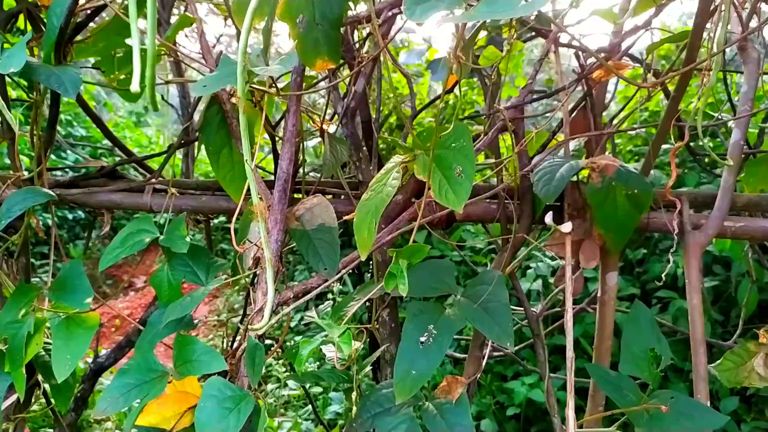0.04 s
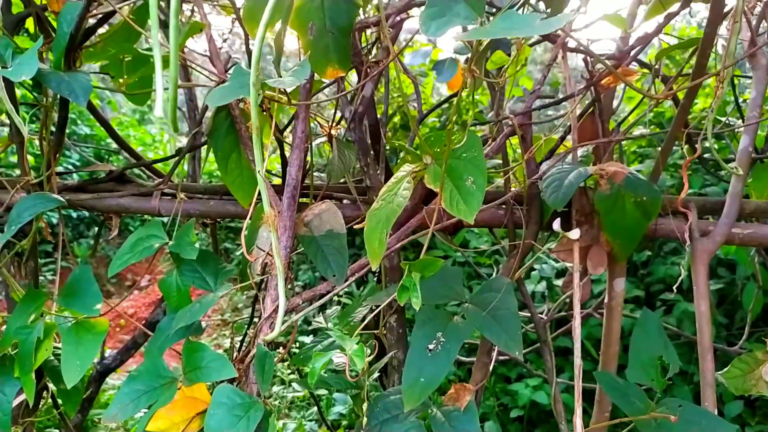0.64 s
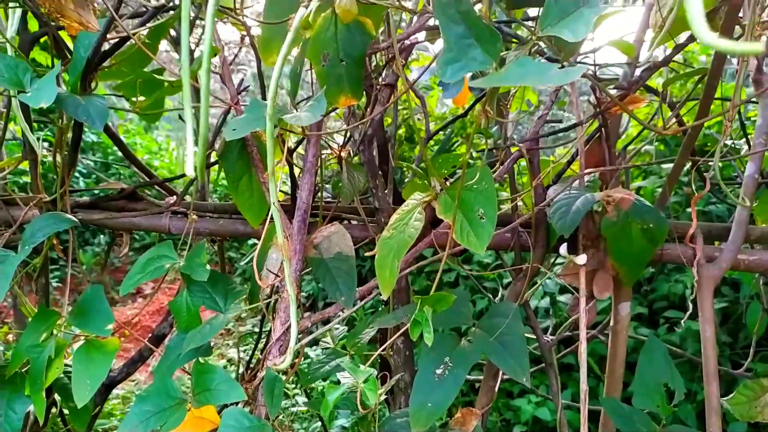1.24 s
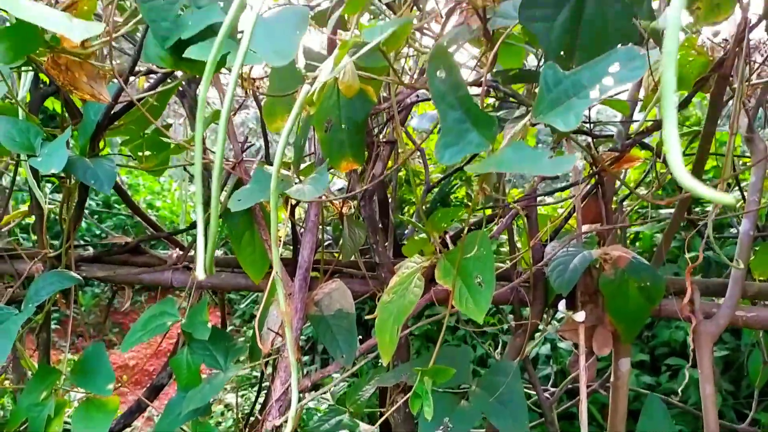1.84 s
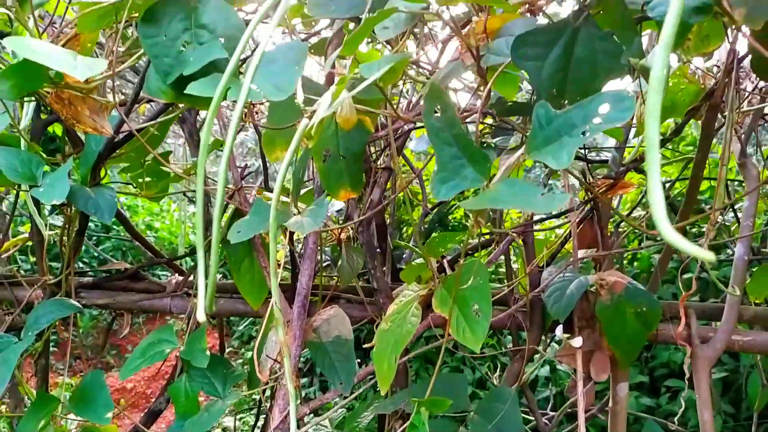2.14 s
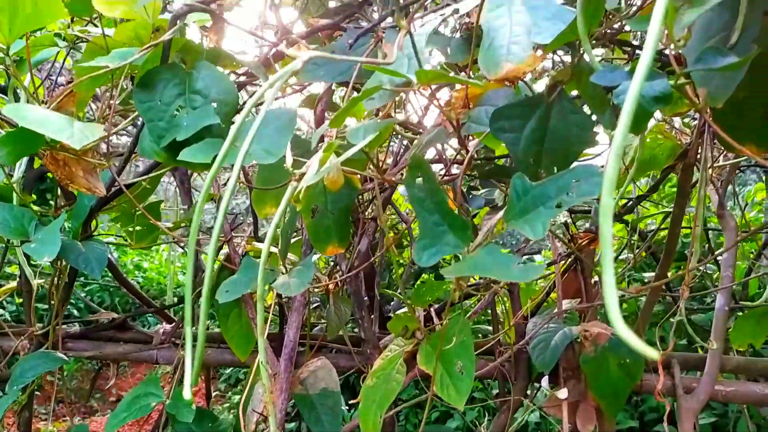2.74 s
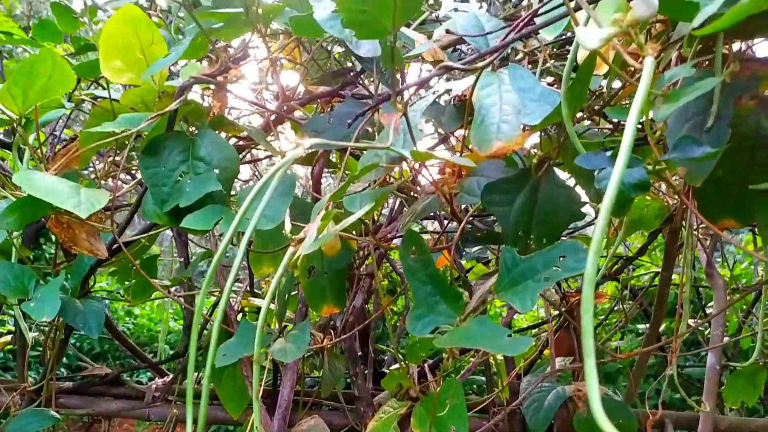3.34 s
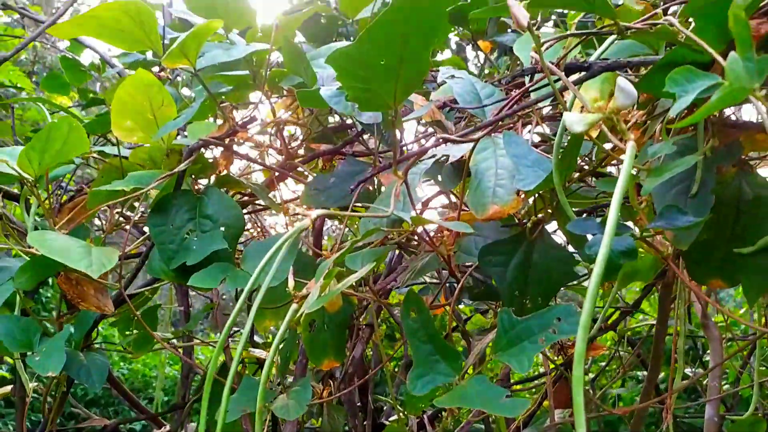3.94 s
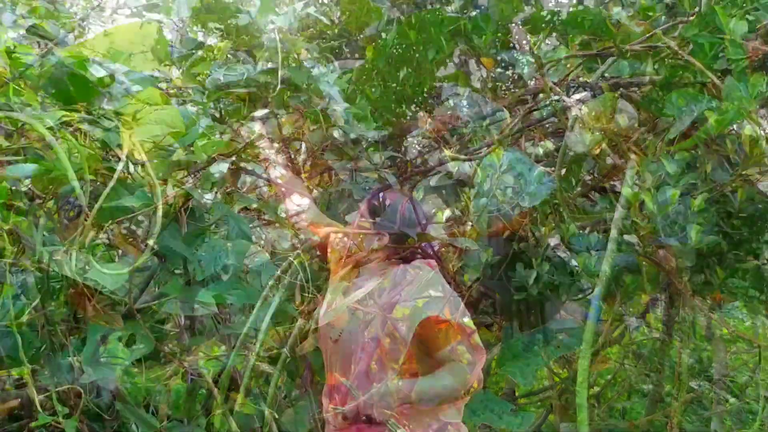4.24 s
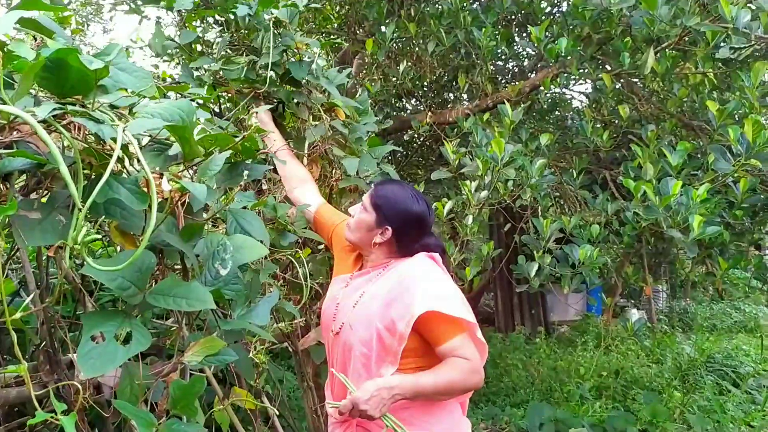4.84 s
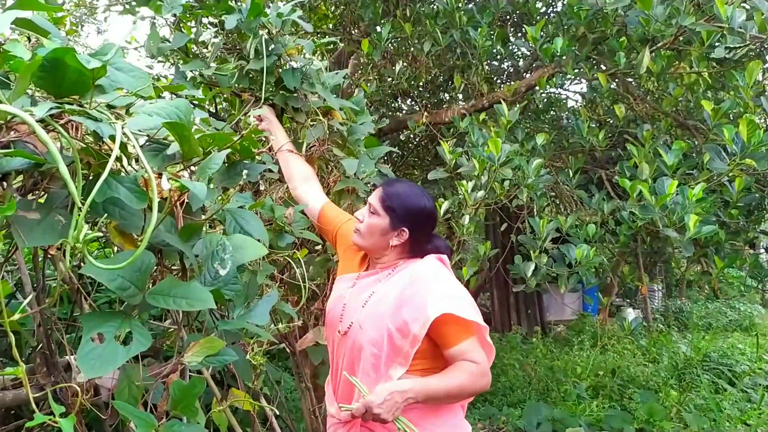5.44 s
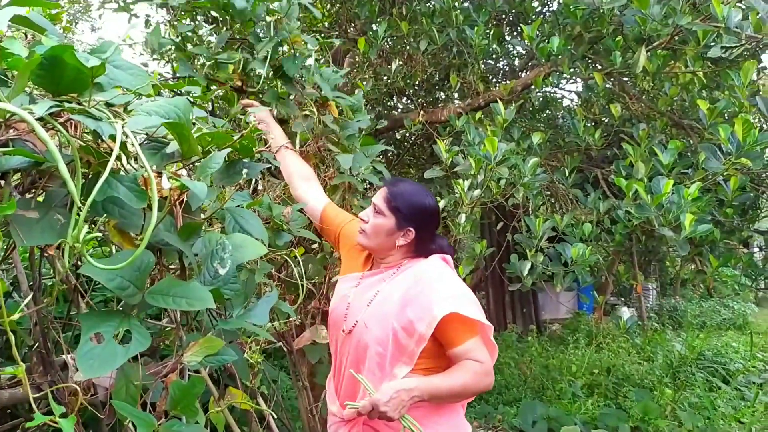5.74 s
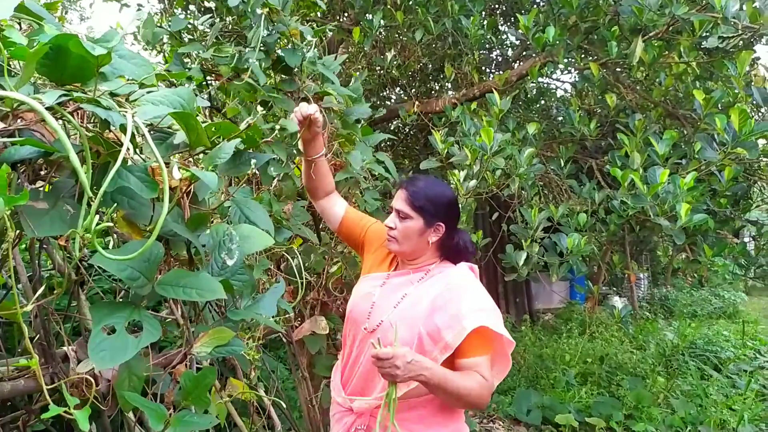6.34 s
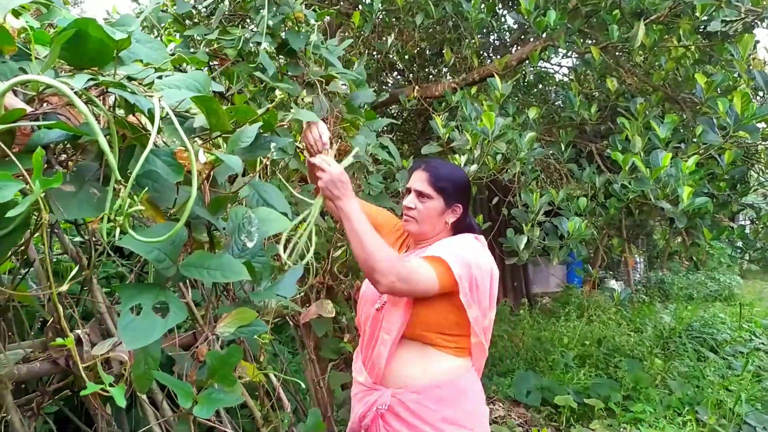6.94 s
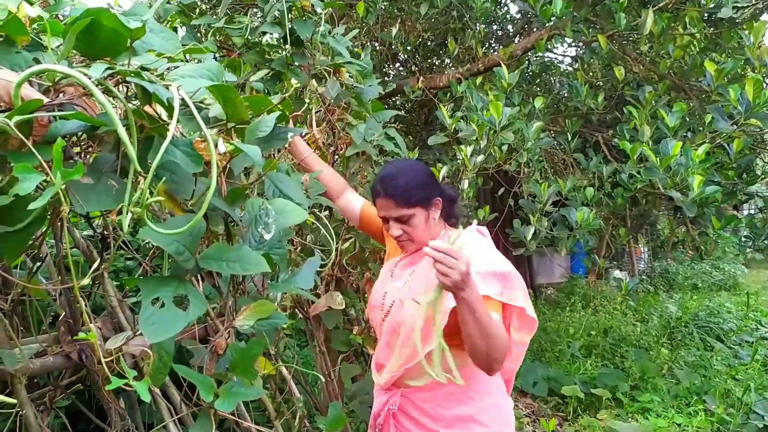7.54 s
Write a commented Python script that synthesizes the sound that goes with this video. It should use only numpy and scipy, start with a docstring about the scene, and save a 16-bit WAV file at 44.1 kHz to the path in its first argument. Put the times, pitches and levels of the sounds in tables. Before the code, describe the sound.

A faint, high insect drone with pulsing cricket trills runs throughout, over a soft outdoor rumble and thin hiss. Close by, bean pods are picked from a vine. A crisp snap comes at about 0.1 seconds, followed by small ticks and leaf rustles. The two loudest cracks land at about 1.2 and 1.4 seconds, the second with tearing fibres and a very brief high ring. The wooden trellis knocks faintly under the tugs. Lighter snaps and rustles follow around 2.3, 2.7 and 3.3 seconds. Near 4.2 seconds the background dips briefly, then returns with the insects a little louder on the left and one short rasp. A cluster of softer snaps comes from the left between 5.4 and 5.7 seconds, two small ones follow near 6.6, and a light leaf brush passes at about 7.4 seconds.

```python
"""Long bean pods snap off a garden vine, each stalk parting in a burst of tearing fibres.
The snaps scatter through the foliage, pulled leaves rustle, the wooden trellis answers each tug
and one freed pod rings. Insects drone and trill with their wings above a faint outdoor rumble and hiss.
Midway the background dips briefly and crossfades to a second outdoor spot,
with insects louder on the left."""
import sys
import numpy as np
from scipy import signal
from scipy.fft import rfft, irfft, next_fast_len
from scipy.io import wavfile

SR = 44100
rng = np.random.default_rng(int(sys.argv[2]) if len(sys.argv) > 2 else 0)


def unload_wav(signal):
    """Save mono or channel-first audio to the path in sys.argv[1] as 16-bit WAV at rate SR, clipped to [-1, 1]."""
    wavfile.write(
        sys.argv[1],
        SR,
        np.round(np.clip(np.atleast_2d(signal).T, -1, 1) * 32767).astype(np.int16),
    )


N = 334719
T = np.arange(N) / SR
CROSSFADE_S = (3.9, 4.32)   # start and end of the background crossfade between the two spots
# crisp colour of a leaf edge catching: freq_hz, level_db
LEAF_EDGE = [(300, -22), (1400, -15), (2600, 1), (4500, -13), (8000, 2.5), (12000, 2), (16000, -6)]


def from_db(db):
    """Decibels to gain."""
    return 10 ** (np.asarray(db) / 20)


def rms_one(x):
    """Scale to unit rms."""
    return x / np.sqrt(np.mean(x ** 2) + 1e-20)


def panned(pan_db):
    """Constant-power stereo gains; pan_db is left minus right."""
    return np.sqrt(2 / (1 + from_db(np.array([[-2], [2]]) * pan_db)))


def at_hz(curve, hz):
    """Read a curve on a log-frequency axis."""
    freqs, values = np.array(curve).T
    return np.interp(np.log(hz + 1), np.log(freqs), values)


def coloured(x, spectrum):
    """EQ noise to a spectrum, at unit rms."""
    size = next_fast_len(x.shape[-1])
    gain = from_db(at_hz(spectrum, np.fft.rfftfreq(size, 1 / SR)))
    return rms_one(irfft(rfft(x, size) * gain, size)[..., :x.shape[-1]])


def resonate(x, hz, width_hz):
    """Two-pole resonance applied twice for steep skirts; unity gain at the peak."""
    r = np.exp(-np.pi * width_hz / SR)
    zeros = np.array([1, 0, -1]) * (1 - r * r) / 2
    poles = [1, -2 * r * np.cos(2 * np.pi * hz / SR), r * r]
    return signal.sosfilt([np.r_[zeros, poles]] * 2, x + 1e-18)


def noise_band(hz, width_hz, shape=(2, N)):
    """Noise through one resonance, at unit rms; stereo by default."""
    return rms_one(resonate(rng.standard_normal(shape), hz, width_hz))


def drift(rate_hz):
    """Random wander at unit rms."""
    return rms_one(np.interp(T * rate_hz, np.arange(4096), rng.standard_normal(4096)))


def swell(centre_s, level_db, half_s):
    """Bell-shaped rise and fall around one moment."""
    return from_db(level_db) * np.exp(-.5 * np.minimum(((T - centre_s) / half_s) ** 2, 100))


def gate(start_s, end_s, fade_s):
    """Held envelope with a linear fade at each end."""
    return np.clip(np.minimum(T - start_s, end_s - T) / fade_s, 0, 1)


def throb(pulse_hz, drift_hz, unsteady=.12):
    """Sine tremolo at an uneven pace."""
    pace_hz = pulse_hz * (1 + unsteady * drift(drift_hz))
    return np.sin(2 * np.pi * np.cumsum(pace_hz) / SR)


def ticks(per_s, size_db, tick_s=0.00096):
    """Random stereo ticks of uneven size, each a tiny dying burst."""
    sizes = from_db(size_db * np.minimum(rng.exponential(1, (2, N)), 4))
    hits = sizes * (rng.random((2, N)) < per_s / SR)
    power = signal.lfilter([1], [1, -np.exp(-1 / (tick_s * SR))], hits ** 2 + 1e-18)
    return np.sqrt(power) * rng.standard_normal((2, N))


def bed_fader(first_db, second_db, dip_db):
    """Background gain: fades in, holds one level for each spot and dips briefly at the crossfade."""
    opening_db = np.interp(T, [0, 0.15], [-6.5, 0])
    lull_db = dip_db * swell(4.22, 0, half_s=0.31)
    return from_db(opening_db + lull_db + np.interp(T, CROSSFADE_S, [first_db, second_db]))


def rumble(level_db=-56.5, surge_db=1.38):
    """Far rumble reaches both ears alike in the bass; each spot gives it its own colour."""
    # colour at the first and second spot: freq_hz, level_db
    first_eq = [(25, -19), (40, -17), (52, 1.5), (62, -1), (73, 2.5), (92, -5), (140, -10.5), (250, -14.5),
                (450, -15.5), (630, -19.5), (930, -11.5), (1300, -18.5), (2400, -18.5), (5000, -29.5)]
    second_eq = [(25, -17), (48, -7), (70, 2), (145, -9.5), (194, -9.5), (266, -14.5), (480, -15),
                 (720, -16), (940, -11), (1250, -17.5), (2400, -18), (5000, -34)]
    # likeness of left and right: freq_hz, correlation
    likeness = [(60, 0.83), (290, 0.94), (640, 0.61), (1300, -0.45), (2600, -0.16)]
    mid, side = rfft(rng.standard_normal((2, next_fast_len(N))))
    alike = np.clip(at_hz(likeness, np.linspace(0, SR / 2, len(mid))), -1, 1)
    noise = irfft(np.sqrt(1 + alike) * mid + np.sqrt(1 - alike) * side * [[1], [-1]])[:, :N]
    blend = np.interp(T, CROSSFADE_S, [0, 1])
    bed = (1 - blend) * coloured(noise, first_eq) + blend * coloured(noise, second_eq)
    return from_db(level_db + surge_db * drift(rate_hz=12)) * bed * panned(0.3)


def hiss(level_db=-52.5):
    """Thin diffuse hiss of the open air."""
    # colour of the air: freq_hz, level_db
    air_eq = [(1000, -9.5), (1800, -4), (2400, 4.5), (4000, -1), (5300, -6), (8000, -37), (11000, -9),
              (13000, -2), (14500, 0.5), (16000, 2.5)]
    return from_db(level_db) * coloured(rng.standard_normal((2, N)), air_eq) * panned(-2.0)


def insect_choirs(pan_shift_db=4.0, waver_db=1.5, widen=1.07):
    """Many far insects merge into shrill bands, louder on the left after the crossfade."""
    # one band per choir: pitch_hz, base_width_hz, first_db, second_db, pan_db
    bands = [(6130, 400, -65.5, -61, 8.5), (7134, 690, -57.5, -56, 10), (9466, 900, -56.5, -55, 5),
             (7440, 3300, -65.5, -56.5, 9), (3620, 2900, -101, -60, 17)]
    blend, out = np.interp(T, CROSSFADE_S, [0, 1]), 0
    for hz, width_hz, first_db, second_db, pan_db in bands:
        level_db = first_db + (second_db - first_db) * blend + waver_db * drift(rate_hz=17)
        band = noise_band(hz, widen * width_hz)
        out += from_db(level_db) * panned(pan_db + pan_shift_db * blend) * band
    return out


def far_crickets(throb_db=2.1):
    """Each cricket is a narrow wing resonance that throbs at its own uneven pace."""
    # single singers: start_s, end_s, pitch_hz, width_hz, level_db, pan_db, pulse_hz
    songs = [(3.2, 7.8, 5660, 260, -63, 3, 30), (1.7, 3.5, 6090, 150, -64, 4, 19),
             (0.05, 1.15, 6760, 340, -57.5, 14, 12), (-0.2, 7.8, 7090, 320, -59.5, 14, 12),
             (2.8, 3.6, 9400, 550, -57.5, 5, 30)]
    out = 0
    for start_s, end_s, hz, width_hz, level_db, pan_db, pulse_hz in songs:
        pulsing = from_db(level_db + throb_db * throb(pulse_hz, drift_hz=13))
        out += gate(start_s, end_s, fade_s=0.14) * pulsing * panned(pan_db) * noise_band(hz, width_hz)
    return out


def near_cricket(pan_db=6, throb_db=3.5):
    """The nearest cricket trills in abrupt bouts; its narrow note throbs with each run of wing strokes."""
    # bouts of trilling: start_s, end_s, pitch_hz, level_db
    bouts = [(0.02, 0.56, 5580, -59.5), (0.6, 1.13, 5580, -61.5), (1.62, 2.122, 5600, -58),
             (2.21, 2.838, 5620, -61), (2.78, 3.11, 5550, -59.5), (3.337, 3.98, 5670, -66),
             (4.14, 4.66, 5630, -63), (4.64, 5.42, 5740, -59.5), (5.62, 6.33, 5660, -57.5),
             (6.3, 7.58, 5630, -63.5)]
    pulsing = rms_one(from_db(throb_db * throb(pulse_hz=26, drift_hz=11)))
    song = sum(gate(start_s, end_s, fade_s=.03) * from_db(db) * noise_band(hz, width_hz=140)
               for start_s, end_s, hz, db in bouts)
    return panned(pan_db) * pulsing * song


def leaf_rustle(stir_db=-55):
    """Leaves slide over each other in fine grains; their edges catch in sparser, crisper ticks."""
    # brushes as the vine is pulled and swings back: centre_s, level_db, half_s, crisp_db, pan_db
    swishes = [(0.27, -53, 0.027, -10, -2), (0.43, -53, 0.012, -8, 2), (0.447, -50, 0.059, -14, -2),
               (1.14, -52.5, 0.35, -13, 1.5), (1.498, -51, .025, -1, -2), (1.553, -48, 0.024, -3.5, -1),
               (1.647, -52.5, 0.059, -3.5, 1), (2.282, -48.5, 0.034, -2, 1), (2.664, -50.5, 0.019, 5.5, 0),
               (2.748, -54.5, 0.033, -5, 2), (5.246, -59, .03, -6, 6), (5.71, -49, 0.026, -9, 6),
               (6.222, -57, 0.072, -2, 7), (6.603, -56.5, 0.069, -9, 9), (7.352, -53, 0.079, -10, 4)]
    # colour of sliding leaf faces: freq_hz, level_db
    face_eq = [(300, -21), (1400, -4), (2400, -0.5), (4000, 0.5), (6000, 4), (9000, -1), (12000, -2.5),
               (16000, -5.5)]
    touch = sum(swell(s, db, half_s) * panned(pan) for s, db, half_s, _, pan in swishes)
    catch = sum(swell(s, db + crisp, half_s) * panned(pan) for s, db, half_s, crisp, pan in swishes)
    slide = coloured(ticks(per_s=1600, size_db=3.3), face_eq) * from_db(2.2 * drift(rate_hz=120))
    crackle = coloured(ticks(per_s=600, size_db=2.4), LEAF_EDGE)
    # the hand never quite rests among the stems
    stir = from_db(stir_db) * panned(2) * coloured(ticks(per_s=70, size_db=2.2), face_eq)
    stir *= bed_fader(first_db=-6, second_db=-6, dip_db=-2.04)
    return touch * slide + catch * crackle + stir


def stalk_snaps(push_s=0.00035, fibre_db=4.5, quiver_db=-21, quiver_s=0.033, break_db=-3, break_s=0.00017):
    """A few fibres give way, then the stalk tears and rings; returns direct sound and foliage send."""
    # stalks and tendrils parting: time_s, level_db, rise_s, tear_s, tilt_db_per_octave, cutoff_hz,
    # knock_db, clack_db, send_db, pan_db
    snaps = [(0.1309, -22.5, 0.001, 0.0014, -4.5, 14500, -24, -7.5, -1, 0.5),
             (0.400, -41, .0005, .0015, -5, 11000, -7, -2, 0, 1),
             (0.441, -35.5, .002, .003, -3, 12000, -12, -2, 1, -3),
             (0.617, -45, .001, .005, -3.5, 13000, 5, 4, 7, -2),
             (0.533, -39.5, .0005, 0.0026, -1, 10500, -5, -11, 8, 4),
             (0.864, -33, .0009, 0.0029, 1, 15000, 23, 7, 2, 0),
             (0.976, -38, .003, 0.0034, -3.5, 15000, -11, 0, 5, -2),
             (1.140, -36, .0008, 0.0024, -1.5, 15000, 9, 0, -2, -2),
             (1.187, -14.5, 0.0016, 0.0029, 4.5, 14000, 13, 7.5, 3, -1.5),
             (1.1872, -5.5, 0.000049, 0.0002, 2.5, 13900, 7, 4, -0.5, -6),
             (1.344, -39, .002, 0.0056, 2, 15000, 0, -2, 0, -1),
             (1.4079, -5.5, 0.00046, 0.00063, 0.5, 15000, 14.5, 0.5, -2, 1),
             (1.4089, -11, 0.00022, 0.0012, -0.5, 14500, -14, -1, -4, 3),
             (1.434, -26, 0.0011, 0.0098, -1, 17000, 2, -1, -1, 1),
             (1.455, -28.5, .001, 0.0039, 1, 16000, -3, -8, 8, -1),
             (2.216, -34.5, 0.0022, 0.0029, 2.5, 14000, 2, 5, 5, 2),
             (2.2782, -26, 0.0012, 0.0019, 1.5, 16000, -3, -1, 4.5, 1),
             (2.636, -37, .0004, .001, 3, 14000, -10, 0, 0, 0),
             (3.293, -33, 0.0012, 0.0054, -4, 10100, -5, 4, -8, -2.5),
             (5.3666, -36, .0005, 0.0024, 5, 16000, 14, 6, 0, 6),
             (5.562, -36.5, .002, 0.0048, 6, 9800, -5, 0, 3, 7),
             (5.627, -33.5, .0005, 0.0013, 5, 10500, -3, 7, 3, 8),
             (5.6382, -26, 0.00034, 0.0013, -0.5, 14000, -9, 5.5, 5, 9),
             (5.643, -32.5, .0005, .0016, -4, 10500, -4, 0, -1, 0),
             (6.603, -40, .0008, .002, 4, 11000, -5, 0, 4, 10),
             (6.643, -38.5, .0018, 0.0033, 2, 10000, -3, 0, 4, 12)]
    # stalk and pod modes, one woody knock, two hollow clacks, then treble:
    # pitch_hz, width_hz, level_db, pan_db
    modes = [(413, 320, -6, 1), (1200, 750, -13, -7), (2320, 640, 2, -3.5), (2980, 1200, -5, 1),
             (5690, 4900, 8, -4.5), (7760, 4300, 9.5, 5), (9340, 4340, 10, -2.5), (12600, 2400, 6.5, -1),
             (15160, 1900, 9.5, -11)]
    out = np.zeros((2, 2, N))
    t = np.arange(-SR // 100, SR // 12) / SR
    pivot_hz = np.median(np.array(modes)[:, 0])
    quiver = from_db(quiver_db) * np.exp(-abs(t) / quiver_s)
    fracture = from_db(break_db) * np.exp(-abs(t) / break_s)
    for time_s, level_db, rise_s, tear_s, tilt, cutoff_hz, knock_db, clack_db, send_db, pan_db in snaps:
        white, sizes = rng.standard_normal((2, 2, len(t)))
        fall = np.exp(-abs(t) / tear_s) + quiver + fracture
        envelope = np.where(t < 0, np.exp(-abs(t) / rise_s), fall)
        cracks = white * from_db(fibre_db * np.minimum(sizes, 2)) * envelope
        # the stalk recoils in one soft mono push
        push = np.exp(-.5 * (t / push_s) ** 2)
        recoil = from_db(knock_db) * np.linalg.norm(cracks[0]) * push / push.sum()
        drives = [recoil] + [from_db(clack_db) * cracks] * 2 + [cracks] * len(modes[3:])
        snap = 0
        for k, (drive, (hz, width_hz, mode_db, mode_pan_db)) in enumerate(zip(drives, modes)):
            gain = from_db(mode_db + tilt * np.log2(hz / pivot_hz)) * panned(mode_pan_db)
            snap += (-1) ** k * gain * resonate(drive, hz, width_hz)
        # soft, sappy stalks lose their top
        snap = signal.sosfilt(signal.butter(2, cutoff_hz, fs=SR, output="sos"), snap)
        tear_rms = np.sqrt(np.sum(snap ** 2, axis=1, keepdims=True) / (tear_s * SR))
        snap = from_db(level_db) * panned(pan_db) * snap / tear_rms
        start = int((time_s + t[0]) * SR)
        out[..., start:start + len(t)] += [snap, from_db(send_db) * snap]
    return out


def foliage(send, near_db=-9, near_t60=0.14, far_db=-19, far_t60=0.94, build_s=0.00078, grain_db=4):
    """Leaves close by, then the trees behind, throw the sound back in countless uneven echoes."""
    # colour of the echoes: freq_hz, level_db
    echo_eq = [(200, -3), (1700, -20), (2400, 0), (3200, 5), (6000, -1), (10000, -4), (13000, -12),
               (16000, -36)]
    t = np.arange(SR // 2) / SR
    response = 0
    for level_db, t60 in ((near_db, near_t60), (far_db, far_t60)):
        white, sizes = rng.standard_normal((2, 2, len(t)))
        grains = coloured(white * from_db(grain_db * sizes), echo_eq)
        tail = grains * from_db(-60 * t / t60) * (1 - np.exp(-t / build_s))
        response += from_db(level_db) * rms_one(tail) / np.sqrt(len(t))
    return signal.fftconvolve(send, response, axes=1)[:, :N]


def trellis(damping=0.91):
    """The woody frame answers with heavily damped low sounds and sways under the hardest pull."""
    # stems rubbing, and stems knocking, on the frame: centre_s, level_db, half_s, pitch_hz
    tugs = [(0.414, -65.5, 0.074, 426), (1.0, -63.5, 0.096, 337), (1.54, -63.5, 0.12, 470),
            (2.096, -66, 0.2, 272), (4.683, -63.5, 0.044, 244), (5.69, -69, 0.033, 480)]
    knocks = [(0.620, -56.5, .0059, 470), (0.868, -58, .0059, 342), (1.085, -56, .0059, 382),
              (1.188, -54, 0.0054, 215), (1.1885, -48.5, 0.0028, 444), (1.19, -48, .002, 1200),
              (5.367, -53.5, 0.0052, 900), (5.593, -54.5, 0.0068, 390), (5.641, -60, .0059, 796)]
    wood = sum(swell(s, db, half_s) * noise_band(hz, damping * hz, shape=N)
               for s, db, half_s, hz in tugs + knocks)
    sway = swell(1.26, level_db=-58, half_s=0.24) * noise_band(hz=61, width_hz=92, shape=N)
    return wood + sway


def leaf_flicks(decay_s=0.0022):
    """A leaf edge slips free with a dry tick that dies at once."""
    # edges flicking past each other: start_s, level_db, pan_db
    flicks = [(0.4228, -46, 0), (0.433, -43, -3), (0.466, -42, -2), (0.487, -44, -3), (0.726, -50, 0),
              (0.7985, -43, 2), (1.0362, -41, 1), (1.0803, -37, 0), (1.090, -43, 0), (1.4204, -29, 1),
              (1.4645, -37, 2), (1.502, -40, -1), (1.516, -38, -2), (1.529, -44, 0), (1.553, -44, -2),
              (1.577, -43, 0), (1.648, -38, 0), (2.297, -40, 1), (2.648, -41.5, 2), (2.665, -38, 3),
              (2.738, -44.5, 0)]
    hits = np.zeros((2, N))
    for start_s, level_db, pan_db in flicks:
        hits[:, [int(start_s * SR)]] = from_db(level_db) * panned(pan_db)
    power = signal.lfilter([1], [1, -np.exp(-2 / (decay_s * SR))], hits ** 2 + 1e-18)
    return np.sqrt(power) * coloured(rng.standard_normal((2, N)), LEAF_EDGE)


def pod_ring(start_s=1.4085, attack_s=0.00053):
    """A taut pod comes free and rings briefly in its own modes."""
    # modes of the pod: pitch_hz, level_db, t60_s, pan_db
    modes = [(2300, -20.5, .013, -6), (3140, -31.5, .028, -1), (5940, -26, .04, -8), (6320, -26, .045, 2),
             (6448, -26.5, .05, 5), (6785, -30.5, 0.05, -7), (7470, -22, 0.056, 11), (7900, -33, .04, 4),
             (11975, -19, .03, -4), (13600, -24, .03, -6), (14700, -28, .02, 0)]
    t = np.arange(SR // 8) / SR
    ring = sum((-1) ** k * from_db(db - 60 * t / t60) * np.sin(2 * np.pi * hz * t) * panned(pan_db)
               for k, (hz, db, t60, pan_db) in enumerate(modes))
    out, start = np.zeros((2, N)), int(start_s * SR)
    out[:, start:start + len(t)] = ring * (1 - np.exp(-t / attack_s))
    return out


def insect_chirps(breadth=0.24, pan_db=5, stroke_hz=150, stroke_db=5):
    """Nearer insects give brief rasps of quick wing strokes."""
    # single rasps: centre_s, level_db, half_s, pitch_hz
    chirps = [(2.907, -49, .003, 5300), (2.93, -52, .008, 5540), (4.349, -49.5, 0.018, 5560),
              (5.474, -53.5, 0.0066, 2770)]
    strokes = rms_one(from_db(stroke_db * np.sin(2 * np.pi * stroke_hz * T)))
    rasps = sum(swell(s, db, half_s) * noise_band(hz, breadth * hz) for s, db, half_s, hz in chirps)
    return panned(pan_db) * strokes * rasps


def scene(snap_db=-2, leaf_db=1.4, cricket_db=-1.9, pod_send_db=-3):
    """Picking in front, insects and open air all round."""
    snaps, snap_send = from_db(snap_db) * stalk_snaps()
    ring = pod_ring()
    rustle = from_db(leaf_db) * leaf_rustle() + leaf_flicks()
    drone = insect_choirs() + from_db(cricket_db) * far_crickets()
    drone *= bed_fader(first_db=-0.63, second_db=0, dip_db=-3.21)
    insects = drone + near_cricket() + insect_chirps()
    air = bed_fader(first_db=0.76, second_db=1.0, dip_db=-3) * rumble()
    air += bed_fader(first_db=1.5, second_db=1.54, dip_db=-2.4) * hiss()
    echoes = foliage(snap_send + from_db(pod_send_db) * ring + rustle)
    return snaps + ring + rustle + echoes + trellis() + insects + air


def record(dry, cutoff_hz=15750):
    """Soft clipping rounds the tallest peaks and a steep low-pass cuts the top."""
    low_pass = signal.ellip(12, .1, 80, cutoff_hz, fs=SR, output="sos")
    return signal.sosfilt(low_pass, np.tanh(dry))


dry = scene()
out = record(dry)
unload_wav(out)
```